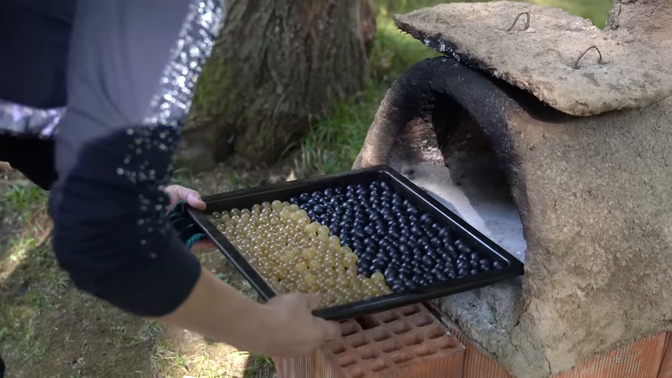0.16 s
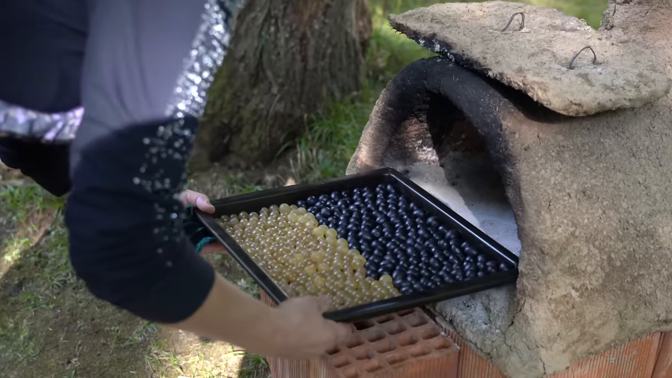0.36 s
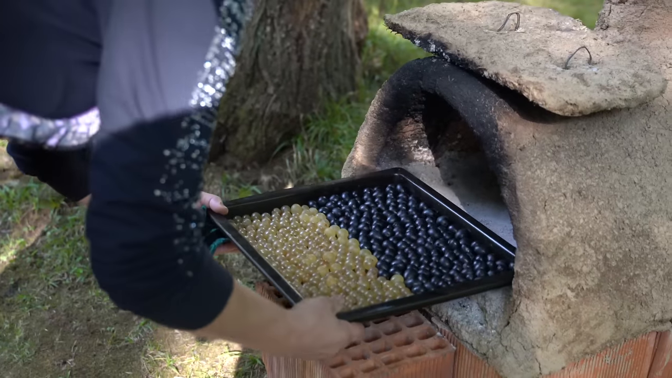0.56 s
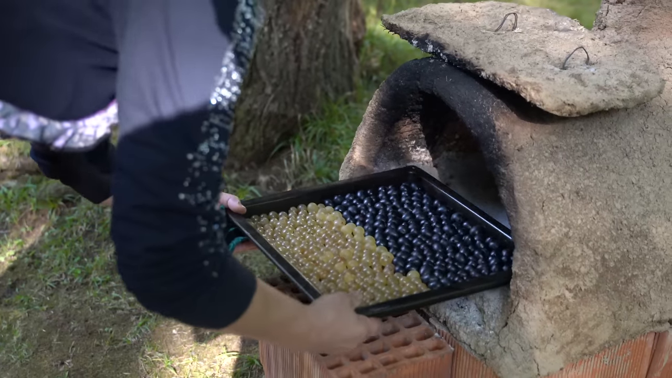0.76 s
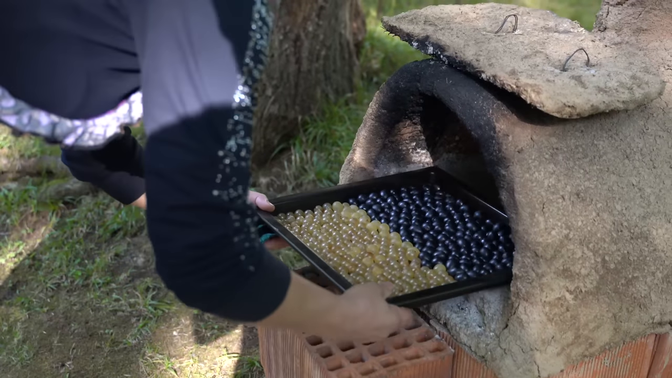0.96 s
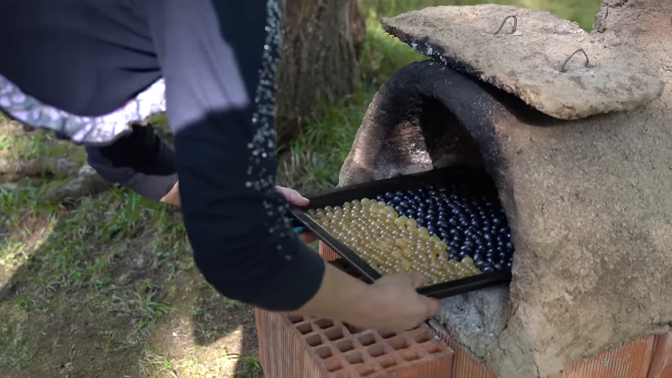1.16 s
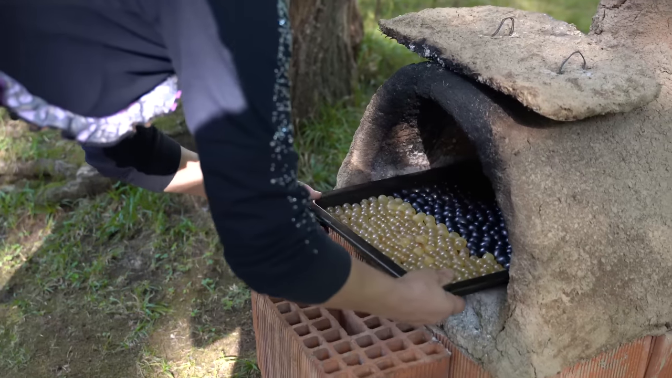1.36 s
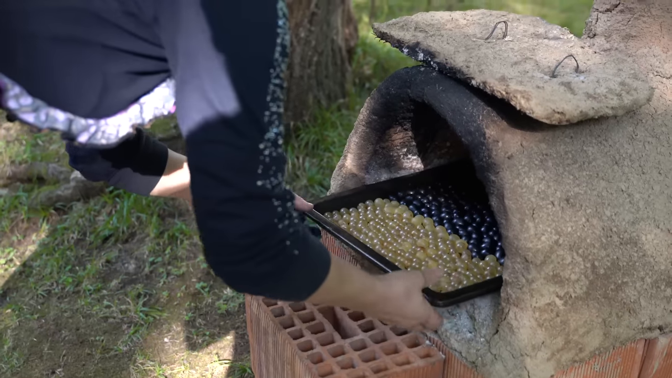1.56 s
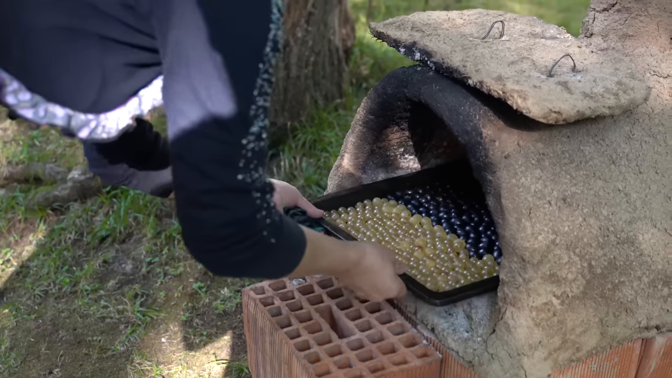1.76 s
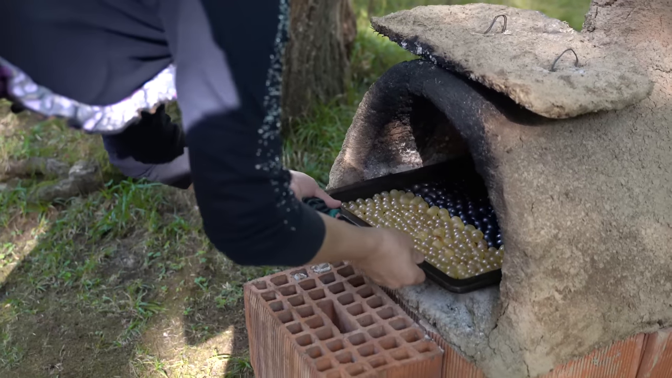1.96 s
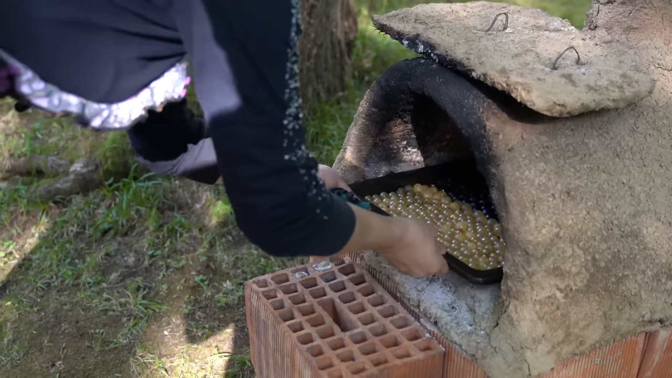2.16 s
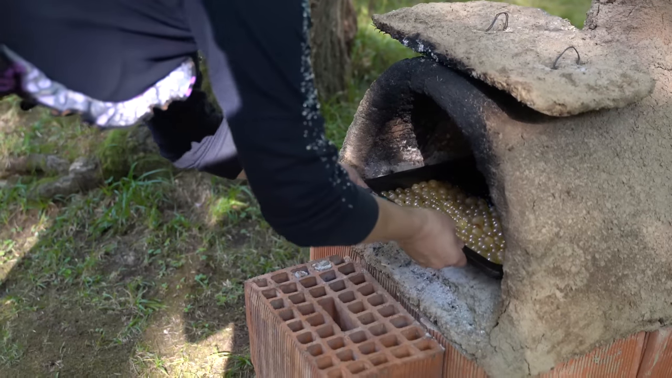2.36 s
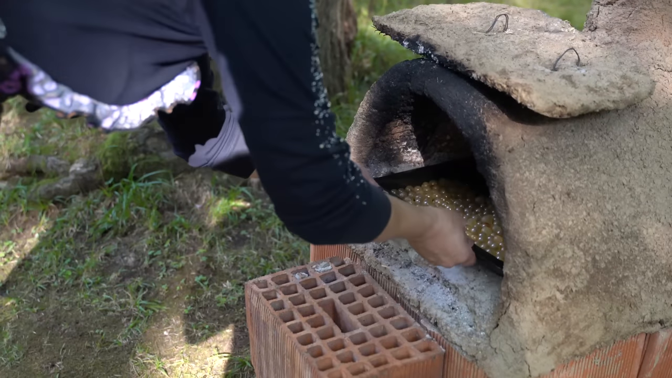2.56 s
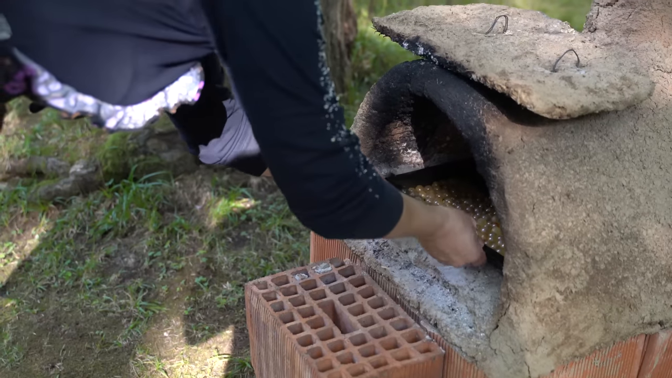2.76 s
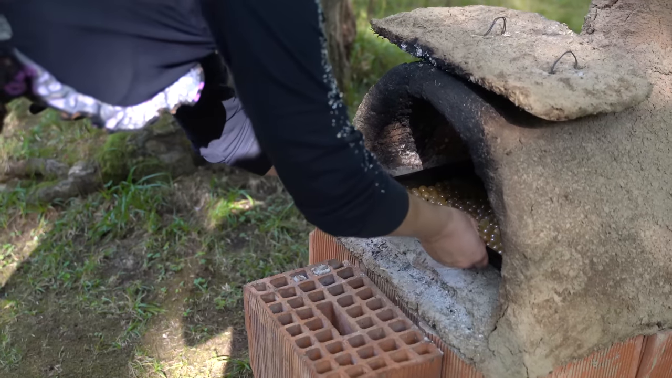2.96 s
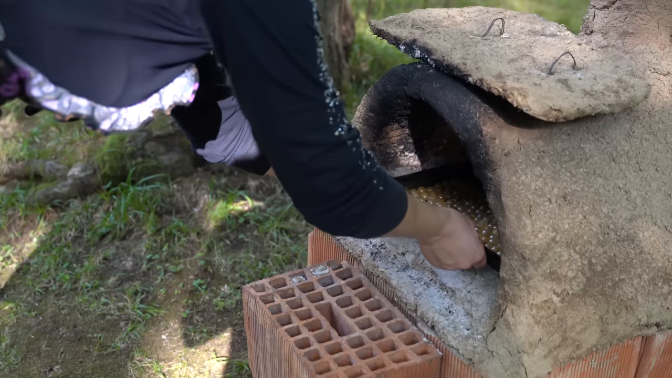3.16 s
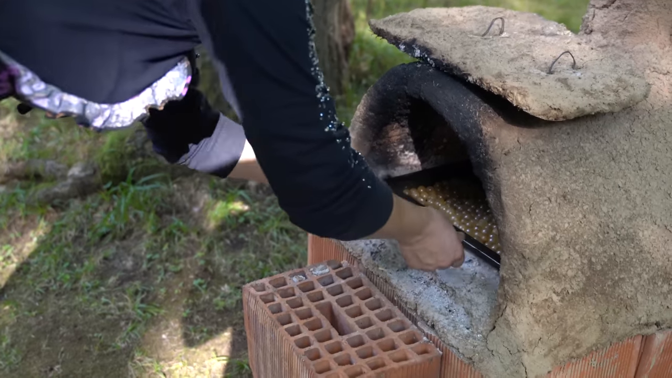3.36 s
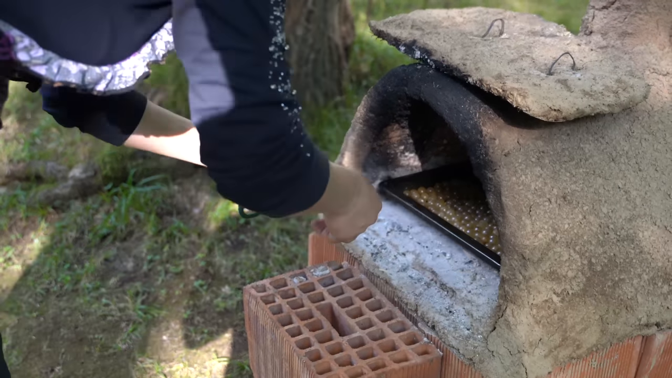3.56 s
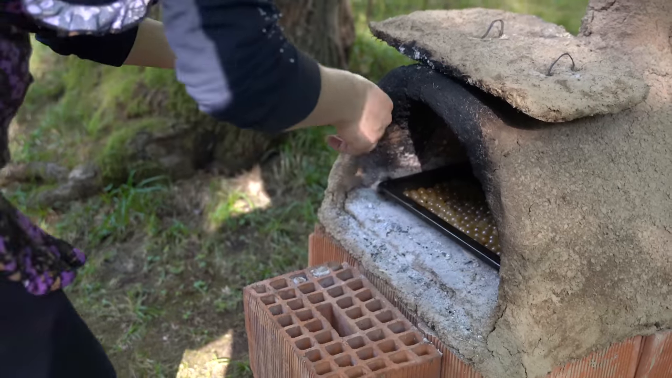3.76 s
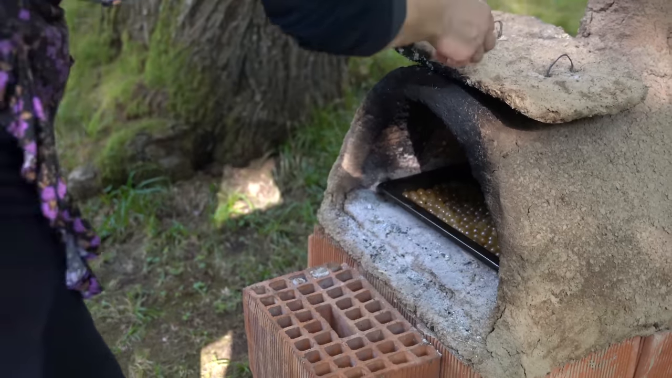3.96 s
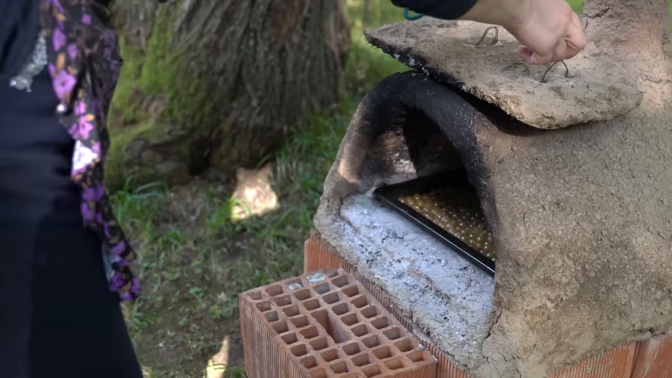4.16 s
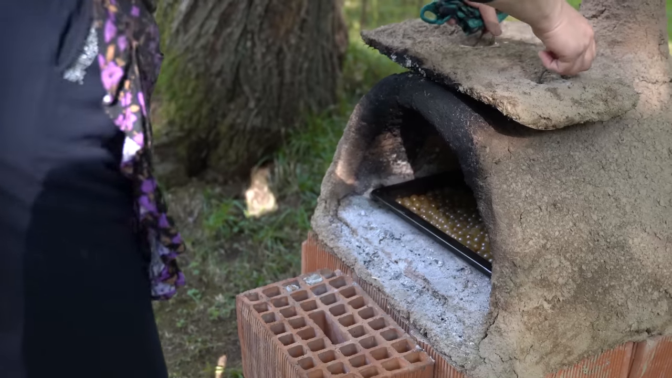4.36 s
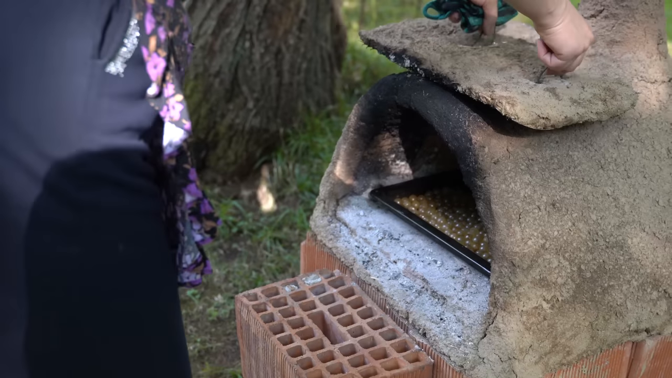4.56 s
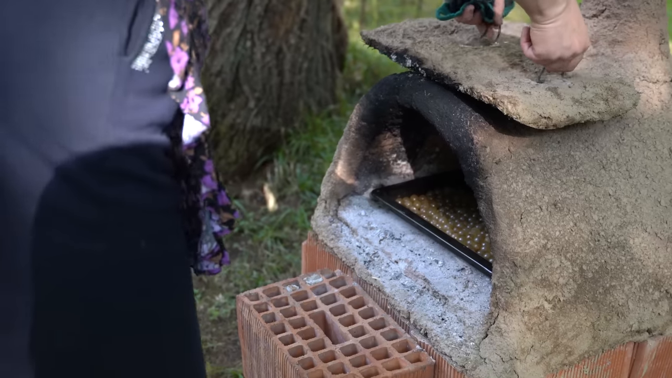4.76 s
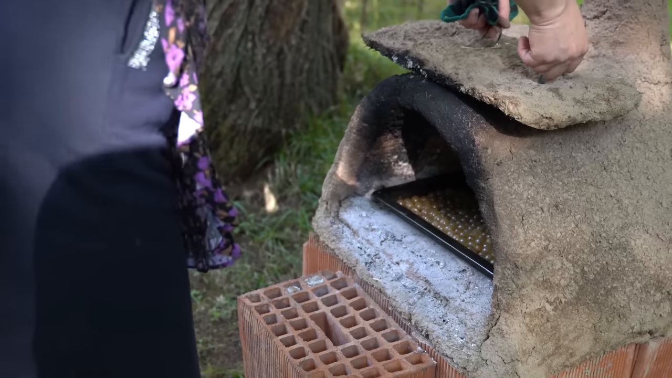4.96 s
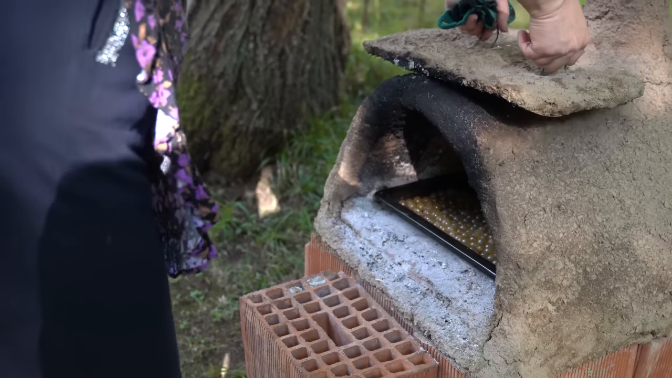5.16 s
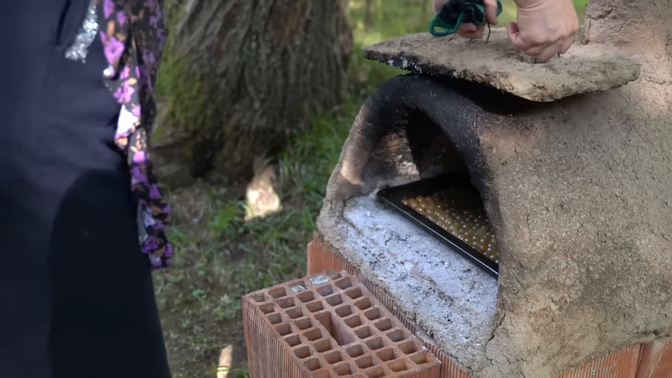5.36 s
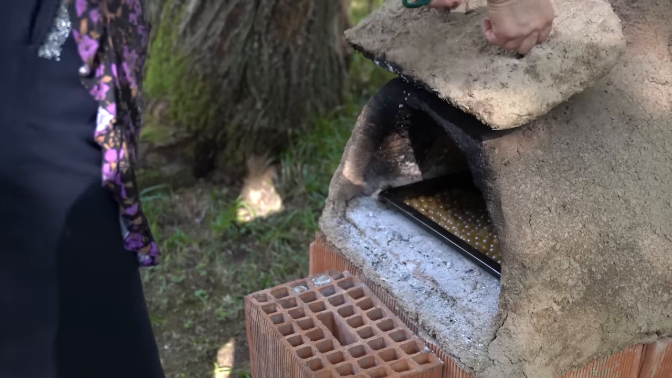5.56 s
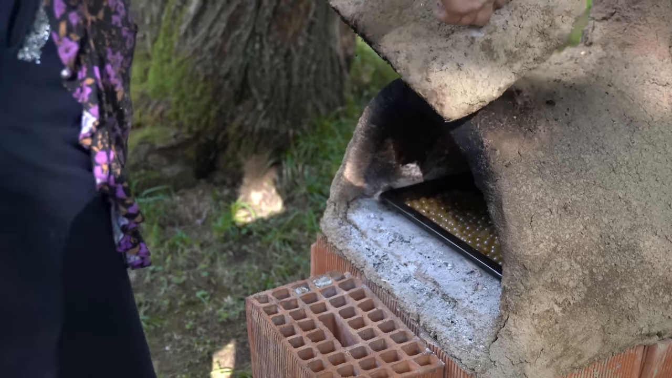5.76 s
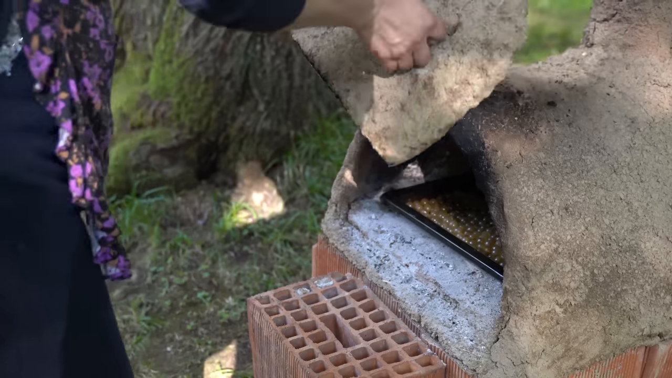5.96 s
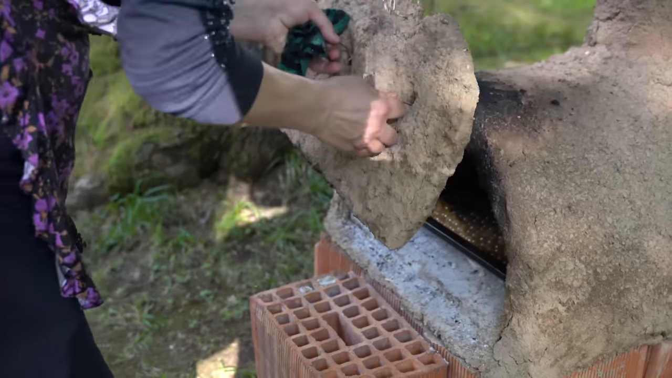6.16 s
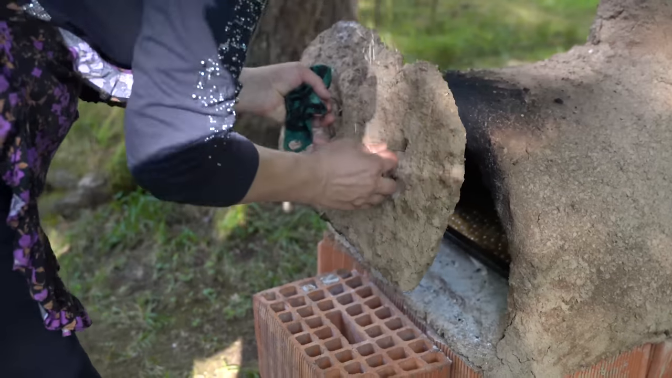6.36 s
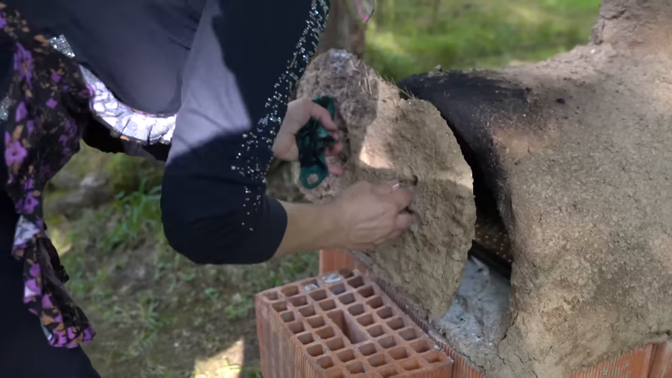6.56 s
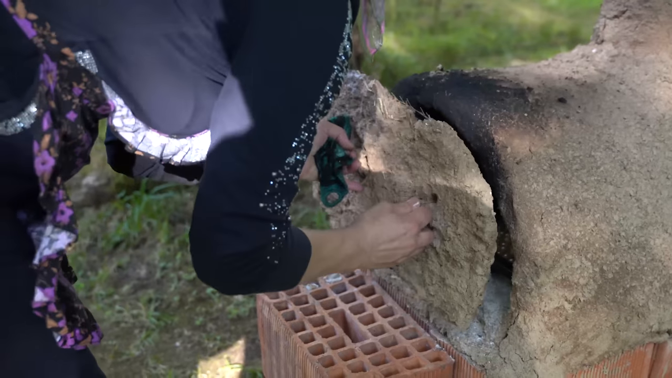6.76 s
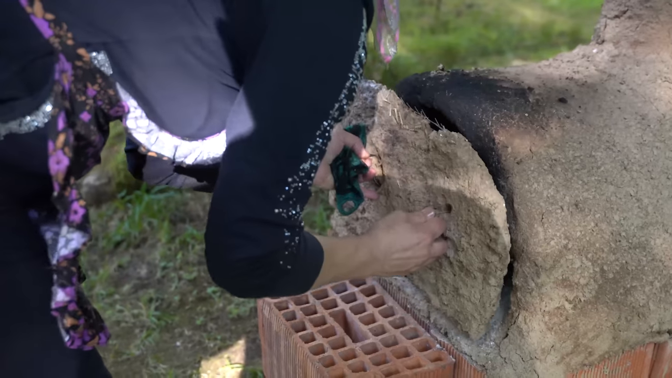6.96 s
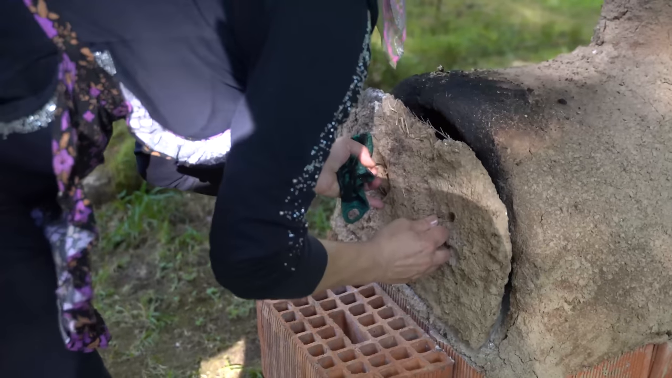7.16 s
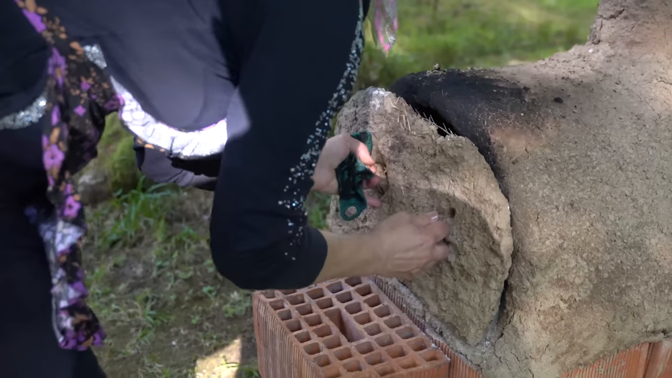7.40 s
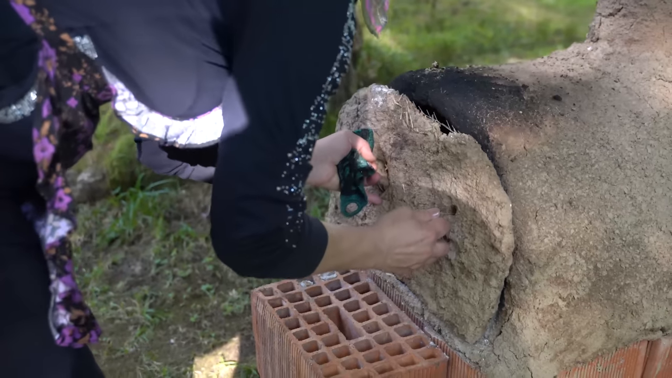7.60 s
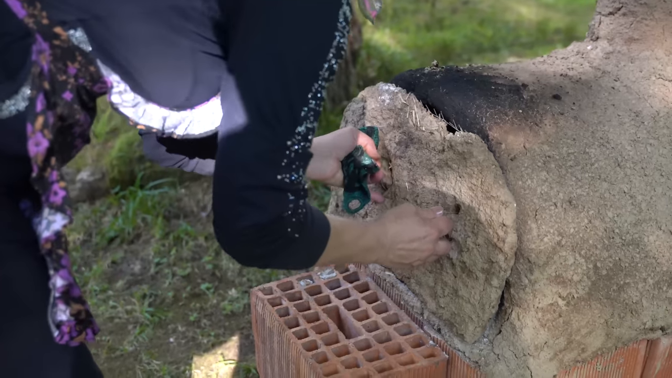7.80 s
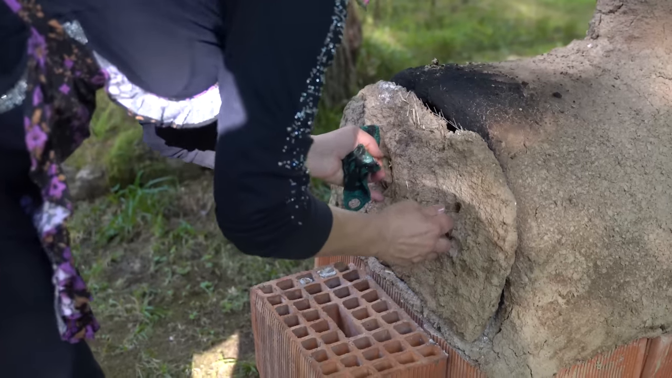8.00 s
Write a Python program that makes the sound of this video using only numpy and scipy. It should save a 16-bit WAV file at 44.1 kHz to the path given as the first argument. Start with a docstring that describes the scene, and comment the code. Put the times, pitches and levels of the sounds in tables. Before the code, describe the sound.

Outdoors, thin metal scrapes and rattles over a sandy oven floor, then soft mitt rustles, dry clay ticks, falling sand and brushing cloth.

```python
"""Outdoors, a clay knock and a tray corner grazing the mouth of a small clay oven. The loaded metal tray catches
on the sill, judders over the gritty floor, glides flat to rest and sings one low note: bursts of micro-impacts
drive banks of decaying modes and scattered noise. A mitt grips the clay slab's wire handles (coloured noise), a
handle squeaks (wavering harmonics), the slab grates off the oven top, sheds sand, cracks grains and is stood
against the mouth as cloth brushes past. Quiet open air (shaped noise) lies behind throughout."""
import sys
import numpy as np
from scipy import signal
from scipy.fft import rfft, irfft
from scipy.io import wavfile

SR = 44100
rng = np.random.default_rng(int(sys.argv[2]) if len(sys.argv) > 2 else 0)


def dump(signal):
    """Clip the signal to [-1, 1] and save it as 16-bit WAV at the path in sys.argv[1]."""
    limited = np.clip(np.atleast_2d(signal).T, -1, 1)
    pcm = np.round(limited * 32767).astype(np.int16)
    wavfile.write(sys.argv[1], SR, pcm)


N = 354387
RING = 8192  # impulse response length, samples

# tray rim catching on the sill: start_s, length_s, body_db, ring_db, grit_db, sparkle_db, favoured_hz
# (soft contact: more body; hard: more ring; sandy: more grit and sparkle)
RIM_SLIPS = [(0.749, 0.01, -70, -47, -53, -61, 3810), (0.758, 0.0052, -44.5, -28, -40, -46, 3970),
             (0.765, 0.0064, -46, -29, -36, -38.5, 3300), (0.774, 0.011, -59, -37, -44, -58, 3840),
             (0.788, 0.0054, -53, -32.5, -39, -56, 3380), (0.874, 0.017, -55, -51.5, -47.5, -52, 1810),
             (0.919, 0.0056, -43, -36.5, -55, -68, 4200), (0.94, 0.0037, -54, -42, -57, -66, 4265),
             (0.992, 0.0045, -43.5, -39.5, -40.5, -44.5, 5880), (1.014, 0.0069, -44.5, -46, -54, -59, 2480),
             (1.037, 0.0095, -50, -44, -47, -50, 2875), (1.048, 0.0038, -46, -32, -48, -53, 3770),
             (1.061, 0.0055, -52, -30, -44, -42, 3720), (1.091, 0.0024, -39.5, -21, -32.5, -34.5, 3680),
             (1.116, 0.01, -47, -40.5, -48, -48, 3670), (1.179, 0.013, -38, -52, -54, -55, 1650),
             (1.215, 0.0045, -34, -37.5, -36.5, -38.5, 1670), (1.226, 0.012, -42, -44, -45, -48, 3670),
             (1.252, 0.016, -39.5, -36, -48, -62, 2880), (1.275, 0.01, -38, -45, -43.5, -56, 1590),
             (1.297, 0.0077, -37.5, -44, -52, -59, 1915), (1.324, 0.0063, -42, -52, -56, -60, 1560),
             (1.334, 0.0044, -42, -38, -41, -41.5, 1640), (1.365, 0.0054, -38, -46, -42, -49, 1640),
             (1.391, 0.0094, -38, -41, -43, -49, 1540), (1.424, 0.0068, -39, -52, -44, -48, 1590),
             (1.438, 0.008, -45, -34, -41, -47, 3650), (1.476, 0.0038, -38, -18.5, -32.5, -39, 3730),
             (1.4825, 0.004, -34.5, -18.5, -40, -42, 3700), (1.49, 0.0069, -42, -39, -52, -54, 3600),
             (1.594, 0.013, -41, -40, -39, -43, 6040), (1.862, 0.047, -57, -56, -53, -59, 6754),
             (1.943, 0.027, -58, -51, -53, -59, 1840), (2.003, 0.01, -43, -30.5, -36, -46, 4200),
             (2.02, 0.0039, -35.5, -21.5, -33, -47, 4460), (2.026, 0.0071, -35.5, -28.5, -39, -42, 4400),
             (2.047, 0.008, -37.5, -38, -52, -62, 1900), (2.084, 0.0026, -60, -36, -54, -60, 4295),
             (2.095, 0.0036, -46, -27, -39, -46, 3700), (2.0995, 0.0026, -35.5, -19.5, -36, -32.5, 4300),
             (2.119, 0.0035, -55, -39, -41, -58, 2510), (2.133, 0.0041, -36, -27, -36.5, -37.5, 1950),
             (2.174, 0.021, -42.5, -58, -51, -58, 1040), (2.191, 0.0089, -46, -41, -38, -51, 2500),
             (2.212, 0.006, -44, -37, -32, -45, 5970), (2.224, 0.0024, -38.5, -28, -27, -36.5, 4500),
             (2.23, 0.012, -43, -39, -35.5, -46, 1970), (2.262, 0.0035, -54, -45, -43, -58, 1925),
             (2.338, 0.012, -48, -56, -62, -66, 1300), (2.383, 0.022, -49, -49, -47.5, -53, 1840),
             (2.49, 0.0082, -45, -42, -51, -58, 3700), (2.533, 0.0087, -39, -41, -48.5, -54, 980),
             (2.562, 0.0062, -49, -50, -52, -49.5, 1650), (2.591, 0.0061, -50.5, -60, -61, -66, 1000),
             (2.681, 0.014, -50, -56, -64, -66, 910), (2.752, 0.015, -55, -51.5, -63, -64, 1690),
             (2.894, 0.0022, -54, -44, -56, -51, 4275), (3.37, 0.0038, -57, -47.5, -59, -58, 4250),
             (3.393, 0.018, -56, -58.5, -61, -59, 1780)]
# loaded sheet sagging onto the sill: start_s, level_db
SHEET_THUMPS = [(0.4, -64), (0.919, -43.5), (0.937, -50), (1.098, -52), (1.491, -56), (2.019, -50.5),
                (2.192, -52), (2.405, -55.5), (2.692, -59)]
# tray resonances, damped by the load: pitch_hz, width_hz, level_db
TRAY_MODES = [(205, 57, -15.5), (239, 56, -11), (401, 69, -16), (460, 66, -16.5), (669, 22, -8),
              (823, 36, -7.5), (917, 66, -7.5), (1109, 47, -4.5), (1256, 120, -6), (1657, 54, 1.5),
              (1898, 73, 2), (2067, 47, -7), (2547, 63, -3), (2855, 61, -4.5), (3240, 45, -8),
              (3515, 42, -1), (3710, 180, -2.5), (4250, 120, -4.5), (4485, 69, -9), (5230, 100, -8.5),
              (5900, 154, -1), (6430, 57, -2), (6710, 82, -7), (6980, 52, -9.5)]
# dense upper modes and oven wall scatter: freq_hz, level_db
TRAY_SCATTER = [(50, -9), (130, -28), (260, -12), (550, -23.5), (1000, -5), (2000, -8), (4200, -6.5),
                (5000, -11.5), (6500, -8), (8500, -15.5), (12000, -16.5), (16000, -19.5)]


def tray_catches():
    """The rim catches and lets go in short, ringing jerks; the sagging sheet only thuds."""
    response = resonator(TRAY_MODES, TRAY_SCATTER, scatter_db=-7.5, scatter_t60_s=0.018,
                         tail_db=-5.5, tail_t60_s=0.14, spot_db=1.5, spread_hz=9800)
    slips = voiced(RIM_SLIPS, thud_db=-26.0, thud_share=0.56)
    thump_s, thump_hz = 0.0092, 342
    thumps = [(start_s, thump_s, [level_db], [thump_hz]) for start_s, level_db in SHEET_THUMPS]
    return contacts(slips + thumps, response, per_s=14000, spread_db=2.5, release=0.68, bite=0.99)


# shoves over the oven floor: start_s, length_s, ring_db, fade_db_per_s (negative: swells)
SHOVES = [(0.934, 0.071, -55.5, 0), (1.008, 0.15, -50.5, -12), (1.214, 0.12, -45, -1),
          (1.404, 0.017, -44, 0), (1.47, 0.18, -55, 10), (1.68, 0.32, -65, -6), (1.989, 0.29, -55, -3),
          (2.168, 0.066, -48.5, -6)]


def shove_db(attack_s=0.0068, release_s=0.046):
    """Each shove builds quickly, mostly holds or swells a little, and dies away when the hands stop."""
    t = np.arange(N) / SR
    power = 1e-14
    for start_s, length_s, ring_db, fade_db_per_s in SHOVES:  # negative fade: swells
        rise = np.clip((t - start_s) / attack_s, 0, 1)
        fall = np.exp(-np.maximum(t - start_s - length_s, 0) / release_s)
        level = undb(ring_db - fade_db_per_s * np.clip(t - start_s, 0, length_s))
        power = power + (rise * fall * level) ** 2
    return 10 * np.log10(power)


# slide under a firm shove, rows thud, body, ring, grit, sparkle: level_db, growth_db_per_db of shove
SLIDE_VOICE = [(-64.5, 0.5), (-45.5, 1.27), (-46.5, 1), (-52, 0.7), (-56, 0.8)]


def tray_slides(firm_shove_db=-45.5, judder_db=2.1, judder_per_s=120,
                slip_per_s=36, slip_rise_db=0.5, uneven_db=3):
    """Grit impacts in quick uneven slips drive the tray; the ring changes as the contact spot wanders."""
    response = resonator(TRAY_MODES, TRAY_SCATTER, scatter_db=-0.5, scatter_t60_s=0.0089,
                         tail_db=-34.0, tail_t60_s=0.031, spot_db=3.5, spread_hz=7100)
    effort_db = shove_db() - firm_shove_db
    slip_rate = slip_per_s * undb(uneven_db * wander(slip_per_s))
    slip_phase = np.cumsum(slip_rate) / SR % 1
    uneven = judder_db * wander(judder_per_s) + slip_rise_db * slip_phase
    judder = undb(np.minimum(undb(effort_db), 1) * uneven)  # weaker under light shoves
    force = unit(judder * asperities(N, per_s=12000, spread_db=3.5))
    first = int(SHOVES[0][0] * SR)
    last = int(sum(SHOVES[-1][:2]) * SR) + RING
    grind = wandering(force, response, first / SR, last / SR, stay_s=0.02)
    return sum(part / np.std(part[:, first:last]) * undb(level_db + growth * effort_db)
               for part, (level_db, growth) in zip(registers(grind), SLIDE_VOICE))


# last slow push, tray flat on the floor: time_s, level_db
GLIDE = [(2.231, -56), (2.29, -61), (2.39, -46.5), (2.46, -49), (2.58, -49.5), (2.7, -53.5), (2.785, -48.5),
         (2.86, -56), (2.99, -55.5), (3.07, -63), (3.3, -65.5), (3.5, -69)]
# resonances of the flat-lying tray: pitch_hz, width_hz, level_db
GLIDE_MODES = [(229, 130, -14), (667, 53, -10), (945, 153, -4.5), (1696, 110, 2), (1890, 92, -7),
               (2050, 90, -1.5), (2660, 190, 0), (3490, 100, 0), (3720, 130, -3.5), (4480, 350, -6),
               (6000, 200, -5.5), (6550, 340, -14)]
# scatter of the flat-lying tray: freq_hz, level_db
GLIDE_SCATTER = [(60, -21), (125, -5), (200, -9), (400, -2), (600, -5), (900, 4.5), (2000, -2), (4000, 1.5),
                 (8000, -2.5), (11000, -9), (16000, -14)]


def tray_glide(waver_db=1.3, waver_per_s=160, lowest_hz=95):
    """Lying flat, the tray rasps finely over sand through steady resonances, and slows to rest."""
    response = resonator(GLIDE_MODES, GLIDE_SCATTER, scatter_db=-0.5, scatter_t60_s=0.003,
                         tail_db=-28, tail_t60_s=0.06, spot_db=2.0, spread_hz=12000)
    time_s, level_db = np.transpose(GLIDE)
    effort_db = np.interp(np.arange(N) / SR, time_s, level_db, left=-140, right=-140)
    effort_db = effort_db + waver_db * wander(waver_per_s)
    grains = asperities(N, per_s=8000, spread_db=3.8)
    rasp = wandering(grains, response, time_s[0], time_s[-1], stay_s=0.015)
    rasp = signal.sosfilt(signal.butter(4, lowest_hz, "high", fs=SR, output="sos"), rasp)
    return rasp / np.std(rasp[:, int(time_s[0] * SR):int(time_s[-1] * SR)]) * undb(effort_db)


# sheet singing as it comes to rest, one row: pitch_hz, level_db, attack_s, length_s, t60_s
SETTLE = (861, -54, 0.015, 0.04, 0.17)


def tray_settles(start_s=3.397):
    """With its last small slip the sheet sings one low note that swells, holds and fades."""
    pitch_hz, level_db, attack_s, length_s, t60_s = SETTLE
    age_s = np.maximum(np.arange(N) / SR - start_s, 0)
    rise = np.minimum(age_s / attack_s, 1)
    fall = np.exp(-np.log(1000) * np.maximum(age_s - length_s, 0) / t60_s)
    return np.sin(2 * np.pi * pitch_hz * age_s) * undb(level_db) * rise * fall


# tray corner on the oven mouth: start_s, length_s, body_db, ring_db, grit_db, sparkle_db
GRAZES = [(0.315, 0.011, -42.5, -42.5, -41.5, -50.5), (0.339, 0.011, -52, -54, -57, -66),
          (0.387, 0.0083, -48, -48.5, -58, -68), (0.398, 0.011, -43, -51, -48, -54)]
# tray and oven mouth at that corner: pitch_hz, width_hz, level_db
GRAZE_MODES = [(870, 45, -6), (1163, 40, -3), (1684, 60, 1.5), (2730, 120, -8), (3610, 130, -2.5),
               (4420, 90, -10), (5910, 70, -8), (6440, 90, -4.5), (6780, 110, -11)]


def corner_grazes():
    """The carried tray brushes the oven mouth with one corner: a soft start and a hollow ring."""
    response = resonator(GRAZE_MODES, TRAY_SCATTER, scatter_db=-10, scatter_t60_s=0.014,
                         tail_db=-11, tail_t60_s=0.18, spot_db=2.5, spread_hz=8800)
    grazes = voiced(GRAZES, thud_db=-22, thud_share=0.9)
    return contacts(grazes, response, per_s=14000, spread_db=2.0, release=0.82, bite=0.26)


# knocks and short scrapes on clay: start_s, length_s, body_db, ring_db, grit_db, sparkle_db
CLAY_CONTACTS = [(0.122, 0.0082, -61, -83, -80, -82), (4.977, 0.0066, -53, -49, -59, -52.5),
                 (5.162, 0.013, -52, -59.5, -58.5, -65), (5.246, 0.0049, -48.5, -52.5, -48, -51),
                 (5.336, 0.013, -54, -55.5, -57, -68), (5.435, 0.025, -64, -58.5, -62, -68),
                 (5.505, 0.0072, -68, -54, -58, -67), (7.2, 0.014, -55, -56.5, -66, -61),
                 (7.241, 0.0044, -52, -52, -59, -56), (7.253, 0.0058, -48, -50, -53, -49.5),
                 (7.266, 0.007, -59, -56, -60, -55), (7.327, 0.0077, -54, -52, -59, -59),
                 (7.34, 0.01, -57, -64, -71, -66), (7.425, 0.0072, -62, -61, -72, -70)]
# clay slab and oven mouth: pitch_hz, width_hz, level_db
CLAY_MODES = [(384, 34, -12), (680, 55, -11), (880, 150, -6), (1220, 150, -4.5), (1740, 93, 0.5),
              (1880, 104, 5.5), (2730, 160, -12), (3610, 230, -1.5), (5900, 680, -8)]
# clay scatter: freq_hz, level_db
CLAY_SCATTER = [(60, -51), (250, -14), (700, -21), (1700, 11), (4000, 10), (8000, 4), (16000, -3)]


def clay():
    """Short force bursts on broad, damped modes: dry, dead ticks and scrapes of clay on clay."""
    response = resonator(CLAY_MODES, CLAY_SCATTER, scatter_db=-5, scatter_t60_s=0.0042,
                         tail_db=-18, tail_t60_s=0.49, spot_db=9.5, spread_hz=9500)
    knocks = voiced(CLAY_CONTACTS, thud_db=-16.0, thud_share=0.95)
    return contacts(knocks, response, per_s=6000, spread_db=3.5, release=1.0)


# slab grating on the oven, heard through the hollow under it: centre_s, length_s, level_db, resonance_hz
GRATES = [(5.35, 0.04, -56, 790), (5.383, 0.032, -59.5, 785), (5.449, 0.035, -54.5, 750),
          (5.523, 0.047, -55.5, 744)]


def grating(width_hz=75, low_hz=420, low_width_hz=90, low_db=-9):
    """Rough clay sticks and slips, sounding two hollow resonances."""
    t = np.arange(RING) / SR
    out = np.zeros(N + RING)
    for centre_s, length_s, level_db, resonance_hz in GRATES:
        swell = np.exp(-2 * ((t - t.mean()) / length_s) ** 2)
        force = asperities(RING, per_s=770, spread_db=-6.0) * swell
        upper = signal.lfilter(*signal.iirpeak(resonance_hz, resonance_hz / width_hz, SR), force)
        lower = signal.lfilter(*signal.iirpeak(low_hz, low_hz / low_width_hz, SR), force)
        grate = unit(upper) + undb(low_db) * unit(lower)
        at = int(centre_s * SR) - RING // 2
        out[at:at + RING] += grate * undb(level_db) * np.sqrt(length_s * SR / RING)
    return out[:N]


# wire handle turning in the slab: time_s, pitch_hz (before waver), level_db
SQUEAK = [(4.912, 2500, -84), (4.928, 2500, -47.5), (4.939, 2500, -55), (4.95, 2544, -39),
          (4.956, 2530, -52), (4.964, 2625, -61), (4.975, 2570, -51), (4.992, 2530, -63),
          (5.015, 2540, -76)]


def handle(overtone_db=(0, -15, -14, -11, -19), flutter_db=4, rub_db=-12):
    """The wire sticks and slips in its hole: a short, unsteady squeak with a little rasp in every cycle."""
    t = np.arange(N) / SR
    time_s, pitch_hz, level_db = np.transpose(SQUEAK)
    slow = signal.butter(2, 600, fs=SR, output="sos")
    waver, flutter = unit(signal.sosfilt(slow, rng.standard_normal((2, N))))
    phase = 2 * np.pi * np.cumsum(np.interp(t, time_s, pitch_hz) * (1 + .03 * waver)) / SR
    tone = sum(undb(db) * np.sin((k + 1) * phase) for k, db in enumerate(overtone_db))
    rasp = (1 + np.cos(phase)) * rng.standard_normal(N)
    rub = unit(signal.sosfilt(signal.butter(2, 1500, "high", fs=SR, output="sos"), rasp))
    squeak = (unit(tone) + undb(rub_db) * rub) * undb(flutter_db * np.tanh(flutter))
    return unit(squeak) * undb(np.interp(t, time_s, level_db, left=-140, right=-140))


# single grains under the slab: start_s, peak_db, low_hz, high_hz
CRACKS = [(5.332, -27, 1300, 7000), (5.506, -37, 2500, 6500), (5.531, -37.5, 2500, 7000),
          (6.0828, -31, 6500, 15000), (6.207, -35, 4700, 7500), (6.4907, -27.5, 1370, 6960),
          (6.7645, -40.5, 1200, 2040), (7.899, -48, 1500, 6000), (7.988, -41, 1800, 4500)]


def cracks():
    """A crushed grain gives one dry tick; the smaller the grain, the higher its band."""
    out = np.zeros(N)
    for start_s, peak_db, low_hz, high_hz in CRACKS:
        at = int(start_s * SR)
        band = signal.butter(2, [low_hz, high_hz], "band", fs=SR, output="sos")
        tick = signal.sosfilt(band, signal.unit_impulse(RING))[:N - at]
        out[at:at + RING] += undb(peak_db) * tick / np.abs(tick).max()
    return out


# dry sand shed by the moving slab: centre_s, length_s, level_db
SAND = [(5.29, .1, -67), (5.927, 0.013, -45.5), (6.091, 0.005, -45), (6.099, .013, -53),
        (6.209, 0.005, -58), (7.145, 0.037, -60), (7.27, .02, -60), (7.436, .006, -54)]
# sand colour: freq_hz, level_db
SAND_COLOUR = [(1000, -34), (4000, -15), (6200, -1), (10000, -7), (14500, 1)]


def sand():
    """Falling grains: dense, bright flicks in short swells."""
    return rustle(SAND, SAND_COLOUR, per_s=18000, spread_db=-3.0, flutter_db=3.5)


# oven mitt closing on the wire handle: centre_s, length_s, level_db
GRIPS = [(4.06, 0.11, -60), (4.33, 0.089, -60.5), (4.52, 0.12, -61), (4.655, 0.051, -64),
         (4.71, 0.092, -54.5)]
# mitt colour: freq_hz, level_db
MITT_COLOUR = [(300, -22), (900, 6.5), (1700, 4), (3400, 8), (5200, 5), (8000, 2.5), (11000, 1.5),
               (16000, -10)]
# resonances added to the rub: pitch_hz, width_hz, gain_db
GRIP_MODES = [(1670, 210, 7), (2450, 340, 5), (7460, 400, -3)]


def mitt():
    """Mitt fibres flick on the wire, with a few resonances raised."""
    return ringing(rustle(GRIPS, MITT_COLOUR, per_s=1800, spread_db=1.5, flutter_db=3.5), GRIP_MODES)


# sleeve and mitt brushing over clothes and slab: centre_s, length_s, level_db
BRUSHES = [(5.735, 0.018, -59.5), (5.785, 0.1, -58.5), (5.915, 0.083, -55), (6.02, 0.054, -62),
           (6.25, 0.12, -59.5), (6.325, 0.047, -58), (6.42, 0.17, -64.5), (7.665, 0.072, -60),
           (7.84, 0.24, -58.5)]
# cloth colour: freq_hz, level_db
CLOTH_COLOUR = [(300, -17), (1100, 7), (1500, 5), (2100, 6), (3400, 9.5), (4600, 5), (8500, 2.5),
                (11000, -3.5), (16000, -8)]
# resonances added to the rub: pitch_hz, width_hz, gain_db
BRUSH_MODES = [(1650, 160, 8), (2700, 120, -6), (3460, 450, -3), (5230, 200, 0)]


def cloth():
    """Cloth fibres flick over clothes and slab, with a few resonances raised."""
    return ringing(rustle(BRUSHES, CLOTH_COLOUR, per_s=1800, spread_db=3.0, flutter_db=2.5), BRUSH_MODES)


# open air: freq_hz, level_db
AIR_COLOUR = [(20, -32), (50, -38), (80, -11), (110, -11), (250, -1), (450, 0.5), (900, 1.5), (1600, 0),
              (2500, -3.5), (4000, -5), (8000, -7.5), (16000, -12.5)]
# left-right likeness of the air: freq_hz, correlation
AIR_LIKENESS = [(60, 0.8), (130, 1), (290, .74), (640, 0.23), (1400, 0.1), (3000, 0.011), (15000, 0.018)]


def air(level_db=-59, drift_db=0.54):
    """Faint open-air hush, nearly the same on both sides in the bass, drifting slowly."""
    mid, side = rfft(rng.standard_normal((2, N)))
    likeness = np.clip(on_log_axis(AIR_LIKENESS, N), -.5, .99)
    side = side * np.sqrt((1 - likeness) / (1 + likeness))
    hush = irfft(np.array([mid + side, mid - side]) * undb(on_log_axis(AIR_COLOUR, N)), N)
    drift = np.interp(np.arange(N), np.linspace(0, N, num=20), rng.standard_normal(20))
    return unit(hush) * undb(level_db + drift_db * np.tanh(drift))


# left-right balance of the oven: freq_hz, left_minus_right_db
BALANCE = [(200, 0), (1300, 0.5), (2400, -1.5), (4200, 0.3), (6000, -4.5), (9000, -7.5), (15000, 1)]


def from_oven(x, lag_s=.00004):
    """The oven stands a little to the right: the left side hears it later and mostly duller."""
    lean = undb(on_log_axis(BALANCE, N) / 2)
    delay = np.exp(-2j * np.pi * np.arange(N // 2 + 1) * SR / N * lag_s)
    return irfft(rfft(x) * np.array([lean * delay, 1 / lean]), N)


def resonator(modes, scatter, scatter_db, scatter_t60_s, tail_db, tail_t60_s, spot_db, spread_hz):
    """Return a function that gives the stereo impulse response for a fresh contact spot."""
    t = np.arange(RING) / SR
    pitch_hz, width_hz, level_db = np.transpose(modes)[:, :, None]
    swing = undb(level_db) * width_hz * np.exp((2j * np.pi * pitch_hz - np.pi * width_hz) * t)
    walls = signal.butter(1, 3500, "low", fs=SR, output="sos")
    apart = signal.butter(1, 4000, "high", fs=SR, output="sos")

    def response():
        """The spot sets each mode's share; high modes reach the two sides out of step."""
        share = undb(spot_db * rng.standard_normal(len(modes))) * rng.choice([-1, 1], len(modes))
        skew = np.exp(1j * rng.standard_normal((2, len(modes))) * pitch_hz.T / spread_hz)
        clear = ((share * skew) @ swing).imag
        # bright early scatter, then a duller tail from the clay walls
        early, late = rng.standard_normal((2, 2, RING))
        tail = signal.sosfilt(walls, late) * undb(tail_db - 60 * t / tail_t60_s)
        mid, side = early * undb(-60 * t / scatter_t60_s) + tail
        side = signal.sosfilt(apart, side)  # the two sides are alike only at long wavelengths
        diffuse = colour(np.array([mid + side, mid - side]), scatter)
        return unit(clear) + undb(scatter_db) * unit(diffuse)
    return response


def contacts(events, response, per_s, spread_db, release, bite=1.0, even=0.66):
    """Each contact is a burst of micro-impacts that bites and lets go; its spot may favour one resonance."""
    lead_width_hz, lead_gain_db = 210, 3.5
    out = np.zeros((2, N + 2 * RING))
    for start_s, length_s, levels_db, leading_hz in events:
        age = np.arange(int(2 * length_s * SR)) / (length_s * SR)  # in contact lengths
        grip = np.minimum(bite + 2 * age, 1) * np.exp(-np.maximum(age - .6, 0) / release)
        spectrum = rfft(grip * asperities(RING, per_s, spread_db)[:len(age)], RING)
        flatter = spectrum / (np.abs(spectrum) + 1e-9) ** even  # drives pitches more evenly
        force = irfft(flatter)[:len(age)]
        sound = signal.fftconvolve(response(), force[None], axes=1)
        sound = ringing(sound, [(hz, lead_width_hz, lead_gain_db) for hz in leading_hz])
        at = int(start_s * SR)
        for part, level_db in zip(registers(sound), levels_db):
            scale = undb(level_db) * np.sqrt(length_s * SR / part.shape[1])
            out[:, at:at + part.shape[1]] += unit(part) * scale
    return out[:, :N]


def voiced(table, thud_db, thud_share):
    """Add a thud to each contact; it follows the ring, and the body by its share."""
    return [(start_s, length_s,
             [ring + thud_db + thud_share * (body - ring), body, ring, grit, sparkle], leading_hz)
            for start_s, length_s, body, ring, grit, sparkle, *leading_hz in table]


def wandering(force, response, start_s, stop_s, stay_s):
    """A sliding contact rings a fresh spot every so often."""
    out, stay = np.zeros((2, N)), int(stay_s * SR)
    for at in range(int(start_s * SR), int(stop_s * SR), stay):
        piece = force[None, at:at + stay]
        out[:, at:at + stay + RING - 1] += signal.fftconvolve(response(), piece, axes=1)
    return out


def rustle(swells, spectrum, per_s, spread_db, flutter_db):
    """Soft, uneven swells of countless tiny flicks: cloth fibres or sand grains."""
    t = np.arange(N) / SR
    swell = sum(undb(level_db) * np.exp(-2 * ((t - centre_s) / length_s) ** 2)
                for centre_s, length_s, level_db in swells)
    flicks = np.array([asperities(N, per_s, spread_db) for _ in range(2)])
    return swell * unit(undb(flutter_db * wander(per_s=39)) * colour(flicks, spectrum))


def asperities(size, per_s, spread_db):
    """Contact force: tiny impacts of random sign and very unequal strength."""
    hit = rng.random(size) < per_s / SR
    hit[0] = True  # never empty
    strength = undb(spread_db * np.minimum(rng.exponential(size=size), 4))
    return hit * rng.choice([-1, 1], size) * strength


def ringing(x, modes):
    """Raise a few resonances by adding peak-filtered copies."""
    return x + sum(undb(gain_db) * signal.lfilter(*signal.iirpeak(pitch_hz, pitch_hz / width_hz, SR), x)
                   for pitch_hz, width_hz, gain_db in modes)


def wander(per_s):
    """Random values joined by straight lines."""
    return np.interp(np.arange(N) / SR * per_s, np.arange(4000), rng.standard_normal(4000))


# band edges of thud, body, ring, grit, sparkle: edge_hz
EDGES_HZ = [138, 600, 2300, 4900, 8000, 15800]
REGISTERS = [signal.butter(4, edge, "band", fs=SR, output="sos") for edge in zip(EDGES_HZ, EDGES_HZ[1:])]


def registers(x):
    """Split a ringing body into thud, body, ring, grit and sparkle."""
    return [signal.sosfilt(sos, x) for sos in REGISTERS]


def colour(x, spectrum):
    """Causal minimum-phase filter with the given (freq_hz, level_db) response, via the cepstrum."""
    size = 2048
    cepstrum = irfft(np.log(undb(on_log_axis(spectrum, size))))
    cepstrum[1:size // 2] *= 2
    cepstrum[size // 2 + 1:] = 0
    impulse = irfft(np.exp(rfft(cepstrum)))
    return signal.fftconvolve(x, impulse[None], axes=1)[:, :x.shape[1]]


def on_log_axis(points, size):
    """Read (freq_hz, value) points at the bins of a transform."""
    freq_hz, value = np.transpose(points)
    bins_hz = np.arange(size // 2 + 1) * SR / size
    return np.interp(np.log(bins_hz + 1e-3), np.log(freq_hz), value)


def unit(x):
    """Scale to rms 1."""
    return x / np.sqrt(np.mean(x ** 2) + 1e-30)


def undb(db):
    """Decibels to gain."""
    return 10 ** (np.asarray(db) / 20)


def scene(slab_left_minus_right_db=-1.5):
    """Tray, slab, handle, cloth and sand at the oven, in open air."""
    tray = corner_grazes() + tray_catches() + tray_slides() + tray_glide() + tray_settles()
    slab = clay() + grating() + handle() + cracks()
    soft = mitt() + cloth() + sand()
    lean = undb(np.array([[slab_left_minus_right_db], [-slab_left_minus_right_db]]) / 2)
    return from_oven(tray + lean * (slab + soft)) + air()


def record(dry, top_hz=16000):
    """A steep elliptic low-pass cuts the top."""
    return signal.sosfilt(signal.ellip(10, .2, 70, top_hz, fs=SR, output="sos"), dry)


dry = scene()
out = record(dry)
dump(out)
```